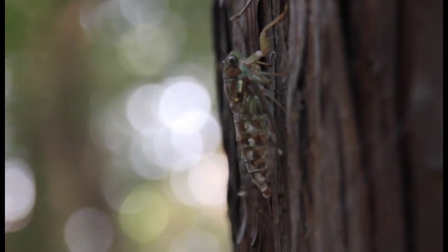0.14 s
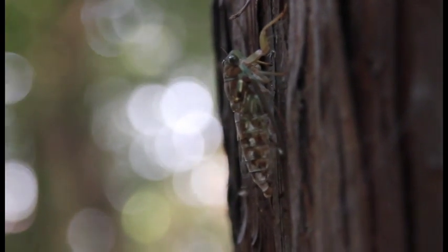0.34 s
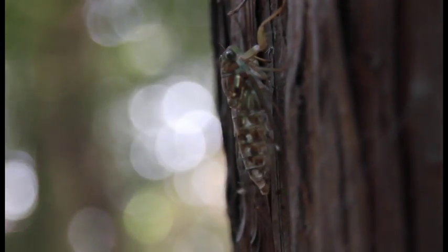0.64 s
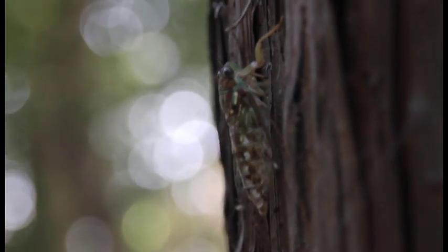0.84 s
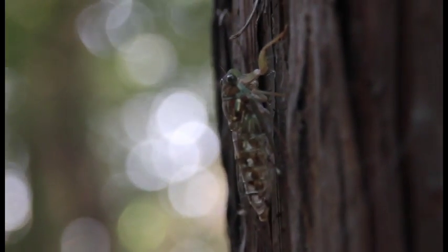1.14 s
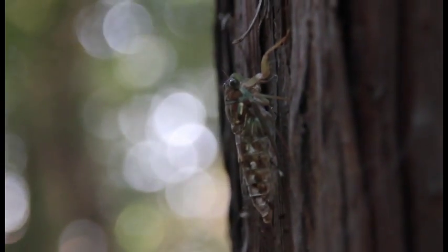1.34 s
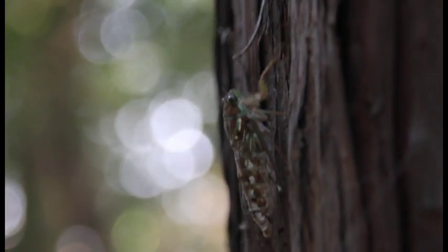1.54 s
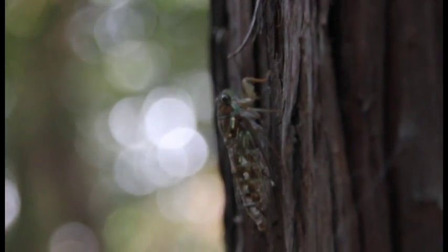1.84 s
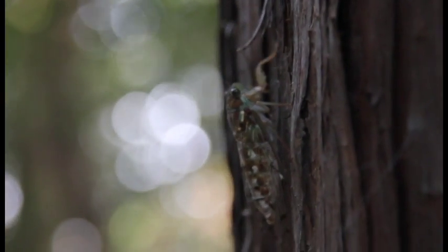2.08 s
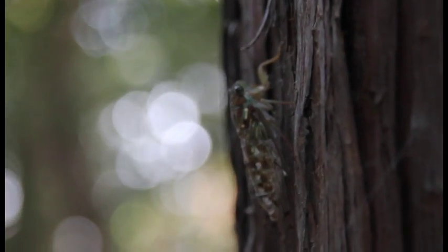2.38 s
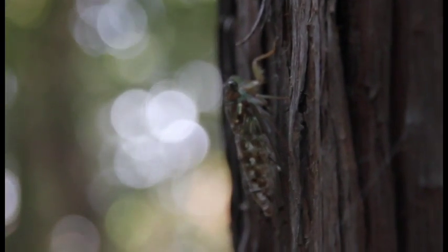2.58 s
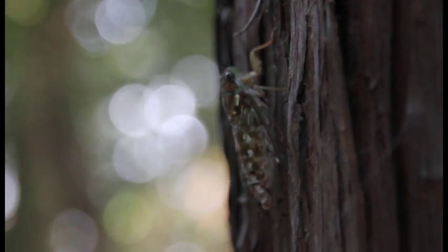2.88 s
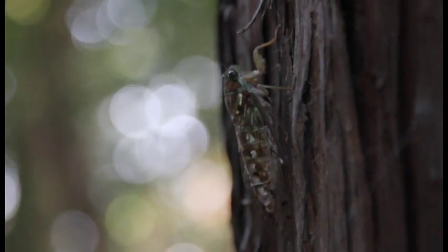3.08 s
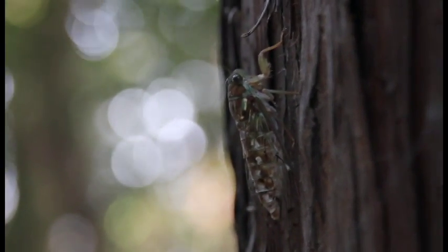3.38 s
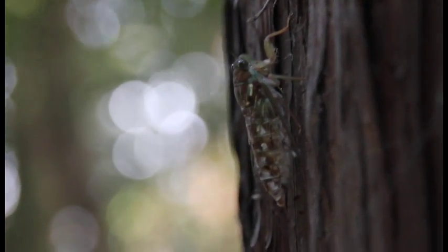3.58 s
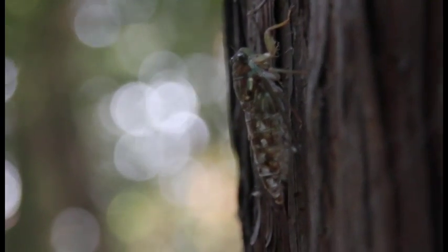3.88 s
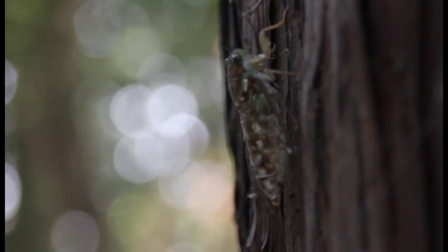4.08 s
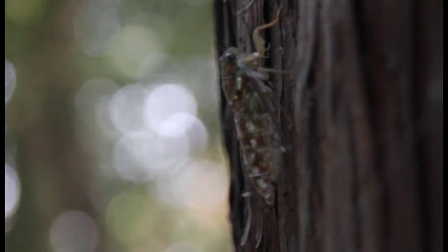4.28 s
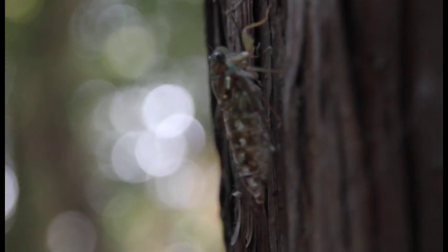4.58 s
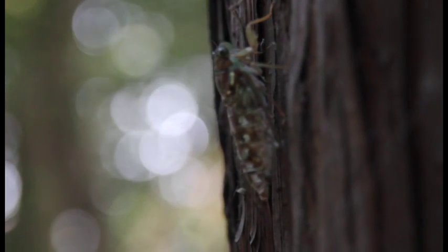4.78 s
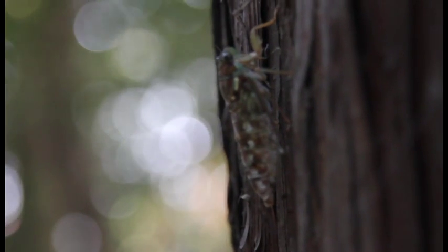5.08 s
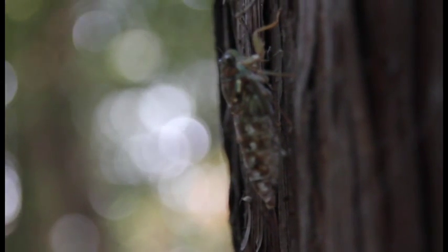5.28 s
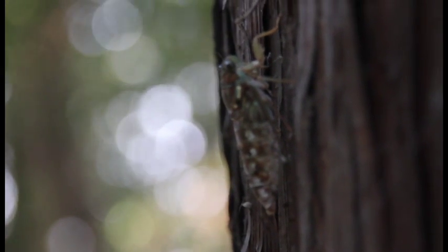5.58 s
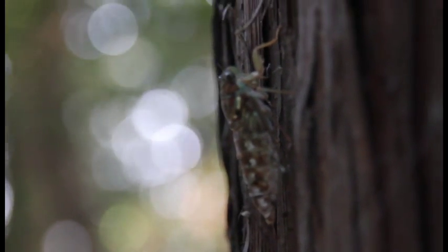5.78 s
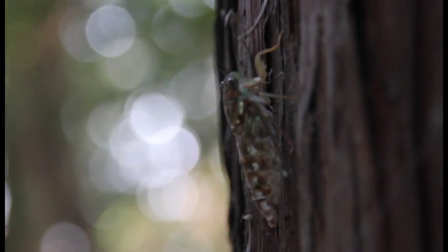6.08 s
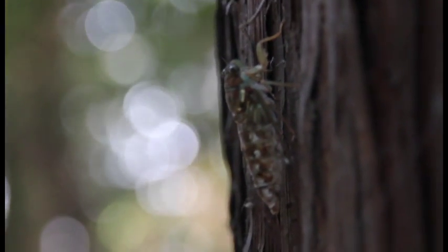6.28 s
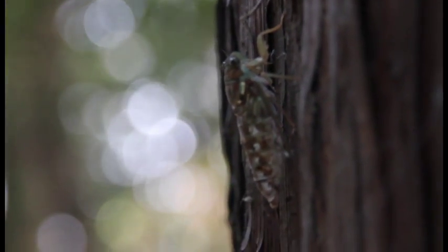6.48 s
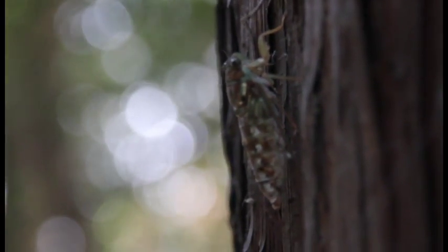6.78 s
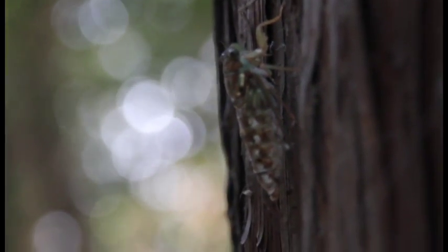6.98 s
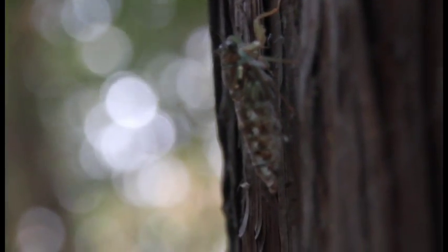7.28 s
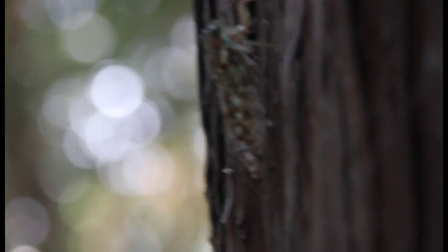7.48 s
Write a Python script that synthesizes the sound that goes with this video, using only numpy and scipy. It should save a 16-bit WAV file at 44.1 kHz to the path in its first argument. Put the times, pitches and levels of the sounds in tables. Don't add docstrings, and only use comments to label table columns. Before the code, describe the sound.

In a forest, a wide high insect hiss and one throbbing, clicky buzzer run throughout. A distant cicada sings echoing short pulses first; then one right beside the microphone starts with dry ticks, swells into loud, bright, rasping chirps about twelve per second, slows and stops. The chorus ducks under it and recovers, while low wind thumps hit the microphone and a faint new caller pulses at the end.

```python
import sys
import numpy as np
from scipy import signal
from scipy.fft import rfft, irfft, next_fast_len
from scipy.io import wavfile
from scipy.ndimage import uniform_filter1d, map_coordinates

SR = 44100
rng = np.random.default_rng(int(sys.argv[2]) if len(sys.argv) > 2 else 0)


def convert_level_to_amplitude(level_db):
    exponent = np.asarray(level_db, float) / 20
    return 10 ** exponent


def output_pcm(signal):
    pcm = np.clip(np.atleast_2d(signal).T, -1, 1) * 32767
    wavfile.write(sys.argv[1], SR, np.round(pcm).astype(np.int16))


N = 336924
TIME = np.arange(N) / SR

# start in seconds, length in seconds, second harmonic in dB.
NEAR_SYLLABLES = [(3.498, .013, -17), (3.584, 0.013, -11.5), (3.6684, 0.016, -4.5), (3.7475, 0.023, 2),
                  (3.827, 0.028, 3.5), (3.907, 0.035, 4.5), (3.9845, 0.039, 4.5), (4.0668, 0.046, 5),
                  (4.1524, 0.048, 5.5), (4.2392, 0.047, 5), (4.329, 0.044, 5), (4.42, 0.043, 5),
                  (4.5142, 0.043, 4.5), (4.61, 0.041, 6), (4.7066, 0.04, 5.5), (4.81, .04, 5),
                  (4.912, .039, 6.5), (5.0072, .035, 6), (5.112, 0.035, 5.5), (5.2177, 0.037, 4.5),
                  (5.3298, .035, 4.5), (5.4513, 0.032, 5), (5.592, .032, 4), (5.7395, 0.027, 4.5)]
# time in seconds, pitch in Hz, fourth harmonic in dB re second,
# loss of the upper harmonics from mid-syllable on in dB.
NEAR_COURSE = [(3.5, 2036, -10, 0), (3.6, 2126, -26, -9), (3.75, 2063, -43, 22), (3.83, 2092, -18.5, 27),
               (3.98, 2142, -3.5, 38), (4.1, 2164, -2, 22), (4.6, 2129, -1.5, 17.5), (5.3, 2096, -1.5, 0.5),
               (5.75, 2071, -3, -1)]
# harmonic number, level in dB re fourth.
OVERTONES = [(5, -5), (6, -16.5), (7, -38)]
# frequency in Hz, density in dB per Hz.
RASP_SPECTRUM = [(200, -13.5), (1300, -20), (1800, -6), (3000, 2), (4700, 6), (7000, 3.5), (9500, 8),
                 (12000, -9), (16000, -31)]
# start in seconds, fundamental peak in dB.
FAR_SYLLABLES = [(1.2444, -33), (1.3274, -28), (1.4124, -24.5), (1.4864, -26), (1.5663, -26), (1.6424, -22),
                 (1.7244, -23), (1.8043, -24), (1.8874, -23.5), (1.9714, -22.5), (2.0674, -28), (2.16, -29),
                 (2.2498, -30), (2.3585, -28.5), (2.4513, -29), (2.5616, -26), (2.6908, -25), (2.9352, -25)]
# time in seconds, pitch in Hz, second harmonic in dB, fourth in dB.
FAR_COURSE = [(1.25, 2025, -22.5, -38), (1.5, 2100, -13, -45), (1.65, 2135, -15, -21),
              (1.8, 2150, -14.5, -26.5), (2.0, 2140, -11, -25), (2.25, 2120, -18.5, -25.5),
              (2.6, 2092, -17, -24), (2.93, 2050, -32, -31)]
# start in seconds, fundamental peak in dB.
EARLY_SYLLABLES = [(0.0294, -34), (0.1194, -46), (0.2438, -33), (0.3396, -33), (0.4244, -33), (0.5294, -35),
                   (0.6379, -35), (0.7332, -30), (0.845, -32), (0.9482, -30), (1.0694, -30)]
# start in seconds, fundamental peak in dB.
LATE_SYLLABLES = [(6.2861, -34), (6.4444, -33.5), (6.5435, -36), (6.6268, -38), (6.7221, -32.5),
                  (6.8139, -43), (6.9072, -29.5), (6.997, -31), (7.0973, -30.5), (7.1811, -34),
                  (7.2953, -33), (7.4244, -37)]
# time in seconds, level in dB.
CHORUS_SWELLS = [(0, -18), (1.2, -17), (2.1, -20), (2.7, -19), (3, -17), (3.5, -19), (5, -17), (6.2, -18),
                 (6.9, -18.5), (7.64, -19)]
# frequency in Hz, density in dB per Hz.
CHORUS_SPECTRUM = [(300, -23.5), (1000, -28), (1700, -30), (2800, -19), (3400, -28), (4100, -12),
                   (4800, -1.5), (5500, 1), (6300, -3), (7200, -10), (8600, -9), (10000, -16.5),
                   (12000, -9), (16000, -30.5)]
# time in seconds, throbs counted so far.
BUZZER_THROBS = [(0, -.29), (.8, 12.15), (2.4, 36.45), (3.6, 54.31), (6.8, 102.4), (7.64, 115.13)]
# frequency in Hz, density in dB per Hz.
BUZZER_SPECTRUM = [(8000, -38), (10000, -34), (11500, -29), (13000, 8.5), (14500, 8.5), (15300, 8),
                   (15950, -7)]
# time in
# seconds, level in dB.
DISTANT_WAVES = [(0, -32.5), (.7, -39.5), (1.5, -27), (2.5, -30.5), (3.2, -35), (4.3, -20), (5.5, -20.5),
                 (6.2, -37), (7.2, -38), (7.64, -45)]
# centre in Hz, width in Hz, level in dB.
DISTANT_BANDS = [(2145, 150, 0.5), (2850, 25, -21), (4286, 410, 2), (8640, 420, -2.5), (1878, 134, -14.5)]
# start in seconds, length in seconds, pitch in Hz, level in dB.
HOOTS = [
    (.9, .12, 1050, -43.5),
    (3.03, .09, 1010, -46),
    (1.84, .09, 1360, -47),
]
# start in seconds, time held in seconds, buffet level in dB.
GUSTS = [(0, 0.34, -43), (.48, 0.19, -42.5), (1.2, .03, -38), (1.65, 0.26, -46), (2.4, .05, -46),
         (2.76, 0.0089, -32.5), (3.32, 0.0092, -35), (3.47, .01, -42), (3.9, 0.15, -29), (4.2, .15, -39),
         (4.45, 0.14, -35.5), (5.06, 0.34, -29), (5.55, 0.2, -29), (5.72, 0.064, -25.5), (5.94, 0.024, -30),
         (6.149, .32, -36), (6.54, 0.055, -43.5), (7.2, .33, -34), (7.63, 0.0072, -29.5)]
# time in seconds, peak in dB, pitch in Hz, sharp edge in dB.
THUMPS = [(0.225, -19, 128, -20), (1.152, -23, 145, -23), (1.82, -16.5, 106, -32), (2.377, -24, 89.5, -26),
          (2.452, -13, 141, -40), (2.745, -13.5, 140, -38), (2.777, -16.5, 125, -34),
          (3.271, -15.5, 208, -14), (3.318, -15, 97, -28), (3.342, -15.5, 153, -32),
          (5.241, -8.5, 143, -12), (5.418, -6, 83, -4.5), (5.546, -4, 187, -30), (5.933, -12, 303, -13.5),
          (5.988, -11, 150, -9), (6.129, -1.5, 195, -6.5), (6.243, -3.5, 244, -37), (6.272, -9.5, 122, -28),
          (6.349, -16, 130, -27), (7.169, -15, 141, -30), (7.225, -16.5, 137, -28), (7.304, -17, 138, -24),
          (7.324, -12.5, 253, -25), (7.344, -12, 174, -1.5), (7.358, -13, 190, -13), (7.392, -14, 133, -10),
          (7.413, -11.5, 159, -29), (7.497, -6, 217, -23), (7.509, -8, 106, -9), (7.617, -3.5, 106, -14.5)]
# frequency in Hz, density in dB per Hz.
RUMBLE_SPECTRUM = [(15, -45), (25, -11), (75, 8), (146, 0.5), (219, 0), (670, -28.5), (800, -57),
                   (1200, -59.5), (1560, -76), (2640, -120)]

FIRST_DB, WARM_DB, WARM_S = -4.5, 12.5, 0.2
DIP, DIP_START, DIP_S = 0.35, 0.69, 0.21
BUCKLES_HZ, SLOWS_HZ_PER_S, UNEVEN, UNEVEN_GROWS_PER_S = 312, 9.9, 0.24, 0.033
LEAD_S, LEAD_START_S = 0.0045, 0.0042
EARLY_HZ, LATE_HZ = 2150, 2092
BUZZER_DB, CLICKS_HZ = -6, 580
BREEZE_DB, RISE_DB_PER_S, FALL_DB_PER_S = -54, 192, 145
CEILING_DB, HOLDS_BACK, SENSE_S, ATTACK_S, RECOVER_DB_PER_S = -12.5, 0.91, 0.0086, 0.004, 19.5
TOP_HZ = 15860


def unit(x):
    return x / np.sqrt(np.mean(x ** 2) + 1e-20)


def curves(rows):
    s, *cols = np.transpose(rows)
    return [np.interp(TIME, s, c) for c in cols]


def wobble(rate_hz):
    knots = rng.standard_normal(int(N * rate_hz / SR) + 4)
    return map_coordinates(knots, [TIME * rate_hz])


def filtered(x, response):
    m = next_fast_len(N + SR // 2)
    return irfft(rfft(x, m) * response(np.fft.rfftfreq(m, 1 / SR)), m)[:N]


def coloured(x, spectrum):
    f, db = np.transpose(spectrum)
    return unit(filtered(x, lambda hz: convert_level_to_amplitude(np.interp(np.log(hz + 1), np.log(f), db))))


def near_caller():
    out = np.zeros(N)
    rasp = coloured(rng.standard_normal(N), RASP_SPECTRUM)
    times, *course = np.transpose(NEAR_COURSE)
    for s, length, second_db in NEAR_SYLLABLES:
        hz, fourth_db, dull_db = [np.interp(s, times, c) for c in course]
        age = s - NEAR_SYLLABLES[0][0]
        cold = np.exp(-age / WARM_S)
        top_db = second_db + fourth_db
        levels = [(1, FIRST_DB - WARM_DB * cold), (2, second_db),
                  (3, second_db + .5 * fourth_db - 15.5), (4, top_db)]
        levels += [(k, top_db + over_db) for k, over_db in OVERTONES]
        depth = DIP + DIP_START * np.exp(-age / DIP_S)
        rate = BUCKLES_HZ - SLOWS_HZ_PER_S * age
        uneven = UNEVEN + UNEVEN_GROWS_PER_S * age
        scrape = convert_level_to_amplitude(second_db + 0.1 * fourth_db - 28.5) * rasp[round(s * SR):]
        call = syllable(length, hz, levels, dull_db, depth, rate, uneven, scrape,
                        lead_s=LEAD_S + LEAD_START_S * cold)
        out[round(s * SR):][:len(call)] += call
    bark = convert_level_to_amplitude(-24.5) * np.roll(out, round(0.011 * SR))
    glade = filtered(np.roll(out, round(.087 * SR)), lambda hz: 1 / (1 + (6500 / (hz + 1)) ** 6))
    return out + bark + convert_level_to_amplitude(-26) * glade + convert_level_to_amplitude(-39) * forest(out, t60=0.45, dull_hz=9000)


def syllable(length, hz, levels, dull_db, depth, rate, uneven, rasp, lead_s=LEAD_S):
    t = np.arange(int((length + .02) * SR)) / SR
    drift = [np.interp(t, np.linspace(0, .07, num=28), c) for c in rng.standard_normal((3, 28))]
    turn = 2 * np.pi * (hz * t + 0.028 * drift[0])
    beat = 2 * np.pi * rate * t + .15 * drift[1]
    pair = 1 + uneven * np.cos(beat / 2)
    gap = pair * np.exp(1.07 * (np.cos(beat - .2) - 1))
    depth = depth * (1 + 2.7 * np.exp(-t / 0.0085))
    dull_db = dull_db / (1 + np.exp((.023 - t) / 0.0024))
    past = np.maximum(t - length + 0.00218, 0)

    kick = np.exp(2.38 * np.cos(beat - 1.5))
    scrape = kick * convert_level_to_amplitude(-.3 * dull_db - 60 * past / 0.0078)
    onset = 2.0 * np.exp(-t / 0.0014)
    out = rasp[:len(t)] * (scrape + onset) * (1 - np.exp(-t / 0.00044))

    for k, db in levels:
        grade = depth * min(k, 3.4)
        rise = (1 - np.exp(-t / 0.0013)) ** (0.07 + .5 * min(k, 2))
        rise = rise * (1 - (0.18 + 0.39 * (k > 1)) / (1 + np.exp((t - lead_s) / 0.0004)))
        waver = .03 * k * drift[2]
        bend = -.13 * grade * pair * np.sin(beat + 0.031)
        fall_db = dull_db * (k > 3) - 3.1 * (1 - convert_level_to_amplitude(-dull_db)) * (k == 2)
        fall_db = fall_db + 60 * past / (0.0095 / k ** 0.05)
        envelope = convert_level_to_amplitude(db + 7.0 - fall_db) * rise * np.exp(waver - grade * gap)
        out = out - envelope * np.cos(k * turn - bend + 0.74 * k * k)
    return out


def far_callers():
    out = np.zeros(N + SR)
    no_rasp = np.zeros(SR)
    times, *course = np.transpose(FAR_COURSE)
    for s, db in FAR_SYLLABLES:
        hz, second_db, fourth_db = [np.interp(s, times, c) for c in course]
        levels = [(1, db - 8.5), (2, second_db - 14), (3, fourth_db - 1.5),
                  (4, fourth_db + 0.5), (5, fourth_db - 7)]
        call = syllable(.036, hz, levels, 5.6, 0.32, 306, 0.42, no_rasp)
        out[round(s * SR):][:len(call)] += call
    for rows, hz in [(EARLY_SYLLABLES, EARLY_HZ), (LATE_SYLLABLES, LATE_HZ)]:
        for s, db in rows:
            levels = [(1, db - 10.5), (2, db - 7.0)]
            call = syllable(0.0373, hz, levels, 0, 0.24, 310, 0.4, no_rasp)
            out[round(s * SR):][:len(call)] += call
    return out[:N] + convert_level_to_amplitude(-5) * forest(out[:N], t60=1.0, dull_hz=5500)


def forest(x, t60, dull_hz):
    t = np.arange(SR // 2) / SR
    tail = rng.standard_normal(len(t)) * convert_level_to_amplitude(-60 * t / t60) * (t > .004)
    wet = signal.fftconvolve(x, tail / np.linalg.norm(tail))[:N]
    return filtered(wet, lambda hz: 1 / (1 + (hz / dull_hz) ** 4))


def wide_chorus(swell_db):
    hiss = coloured(patchy(depth_db=0.5), CHORUS_SPECTRUM)
    return convert_level_to_amplitude(swell_db + 0.13 * wobble(5.74)) * hiss


def patchy(depth_db):
    z = signal.stft(rng.standard_normal(N), nperseg=512)[2]
    field = uniform_filter1d(rng.standard_normal(z.shape), size=6, axis=0)
    field = uniform_filter1d(field, size=8, axis=1)
    return signal.istft(z * convert_level_to_amplitude(depth_db * unit(field)), nperseg=512)[1][:N]


def buzzer(swell_db):
    clicks = 2 * np.pi * CLICKS_HZ * TIME + .5 * wobble(1.7)
    gate = np.exp(0.99 * np.cos(clicks) + 0.17 * np.cos(clicks / 2))
    throb = np.exp(0.31 * np.cos(2 * np.pi * curves(BUZZER_THROBS)[0]))
    buzz = coloured((.5 + unit(gate * throb)) * rng.standard_normal(N), BUZZER_SPECTRUM)
    return convert_level_to_amplitude(swell_db + BUZZER_DB) * buzz


def distant_callers():
    def bands(hz):
        return sum(convert_level_to_amplitude(db) / (1 + ((hz - centre) / width * 2) ** 2) for centre, width, db in DISTANT_BANDS)

    murmur = unit(filtered(convert_level_to_amplitude(1.24 * wobble(14)) * rng.standard_normal(N), bands))
    return convert_level_to_amplitude(curves(DISTANT_WAVES)[0]) * murmur


def chorus():
    swell_db = curves(CHORUS_SWELLS)[0]
    return wide_chorus(swell_db) + buzzer(swell_db) + distant_callers()


def bird():
    out = np.zeros(N)
    for s, length, hz, db in HOOTS:
        swell = np.sin(np.pi * np.clip((TIME - s) / length, 0, 1))
        out += convert_level_to_amplitude(db) * swell * np.sin(2 * np.pi * hz * TIME)
    return out


def wind():
    rumble = coloured(rng.standard_normal(N + SR), RUMBLE_SPECTRUM)
    return filtered(buffeting(rumble) + thumps(rumble), lambda hz: hz ** 2 / (hz ** 2 + 35 ** 2))


def buffeting(rumble):
    gusts_db = []
    for s, held, db in GUSTS:
        off_db = np.maximum(RISE_DB_PER_S * (s - TIME), FALL_DB_PER_S * (TIME - s - held))
        gusts_db.append(db - off_db.clip(0))
    level = convert_level_to_amplitude(np.max(gusts_db, axis=0).clip(BREEZE_DB) + 3.5)
    return level * unit(convert_level_to_amplitude(4.7 * wobble(30)) * rumble)


def thumps(rumble):
    out = np.zeros(N + SR)
    t = np.arange(-SR // 40, SR // 20) / SR
    for s, db, hz, edge_db in THUMPS:
        start = round(s * SR) - SR // 40
        swell = np.exp(-np.abs(t) * hz * np.where(t < 0, 2.5, 1.2))
        push = swell * np.sin(2 * np.pi * hz * t * (1 - 6 * t) + 0.5)
        edge = np.exp(-np.abs(t) / 0.0011) * np.sin(2 * np.pi * 450 * t)
        flutter = 0.25 * np.exp(-np.abs(t) / 0.0055) * np.resize(rumble[start:], len(t))
        out[start:][:len(t)] += convert_level_to_amplitude(db) * (push + flutter + convert_level_to_amplitude(edge_db) * edge)
    return out[:N]


def scene():
    mix = near_caller() + far_callers() + chorus() + bird() + wind()
    return np.tile(mix, (2, 1))


def gain_control(x):
    size, lag = round(SENSE_S * SR), round(ATTACK_S * SR)
    fourth_power = uniform_filter1d(x ** 4, size=size, origin=(size - 1) // 2)
    sensed_db = 5 * np.log10(np.abs(fourth_power) + 1e-20)
    climb_db = RECOVER_DB_PER_S * TIME
    target_db = HOLDS_BACK * (CEILING_DB - sensed_db)
    gain_db = np.minimum(0, climb_db + np.minimum.accumulate(target_db - climb_db))
    return x * convert_level_to_amplitude(uniform_filter1d(gain_db, size=lag, origin=(lag - 1) // 2))


def low_pass(x):
    return signal.sosfilt(signal.butter(12, 16610, fs=SR, output="sos"), x)


def record(dry):
    levelled = np.clip(gain_control(dry[0]), -1, 1)
    heard = filtered(levelled, lambda hz: hz < TOP_HZ)
    return low_pass(np.tile(heard, (2, 1)))


dry = scene()
out = record(dry)
output_pcm(out)
```